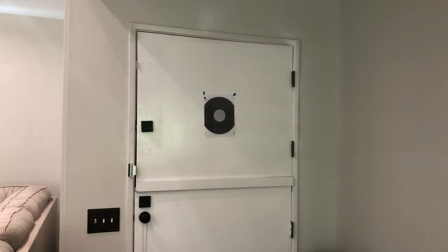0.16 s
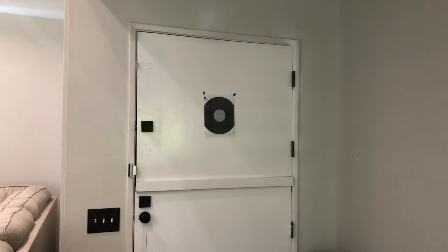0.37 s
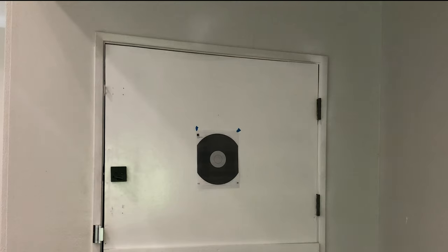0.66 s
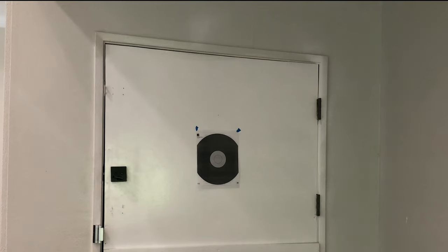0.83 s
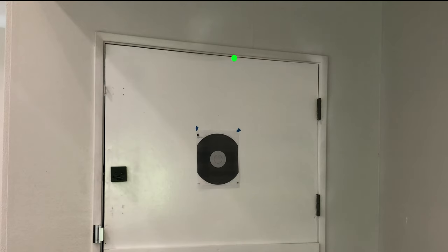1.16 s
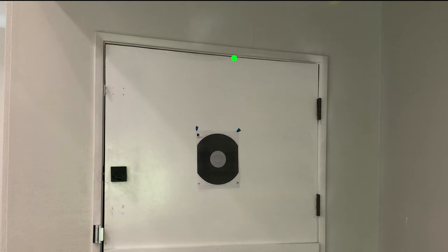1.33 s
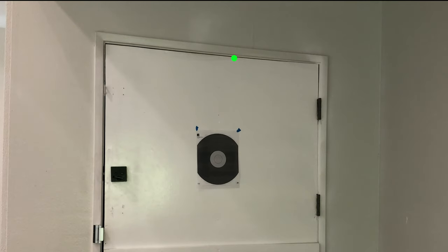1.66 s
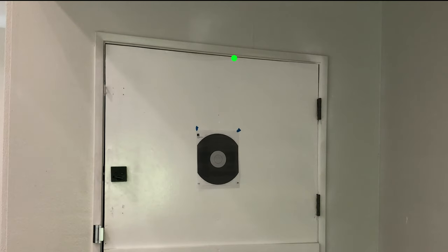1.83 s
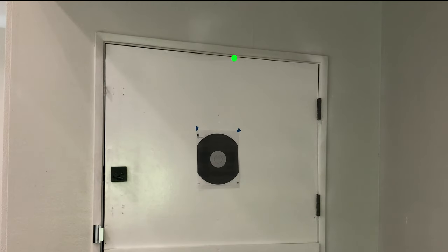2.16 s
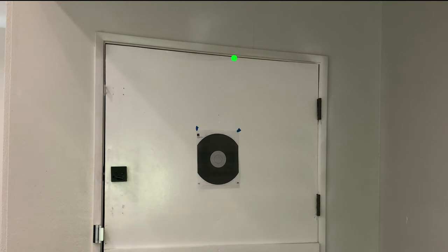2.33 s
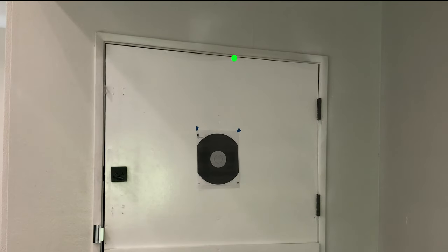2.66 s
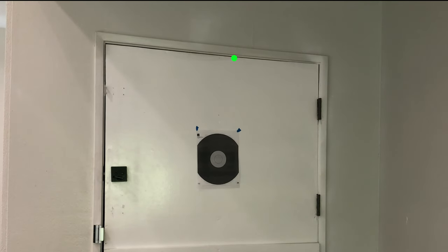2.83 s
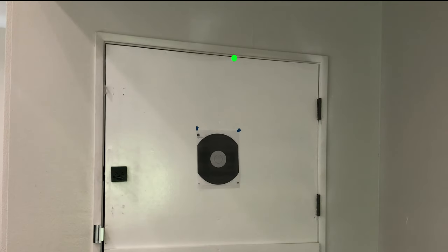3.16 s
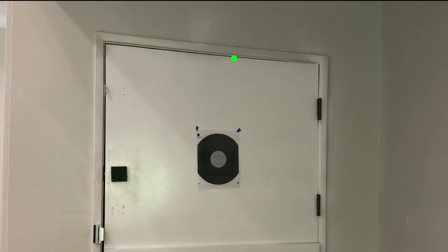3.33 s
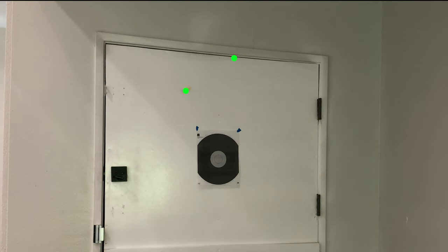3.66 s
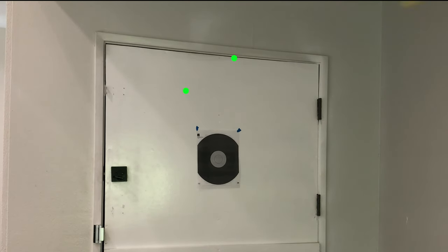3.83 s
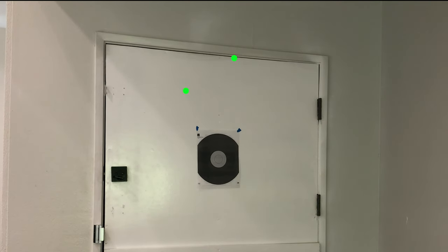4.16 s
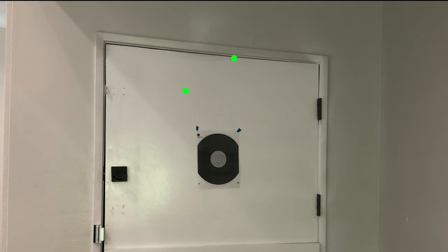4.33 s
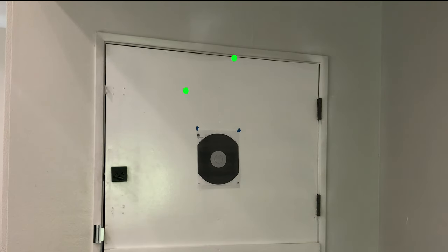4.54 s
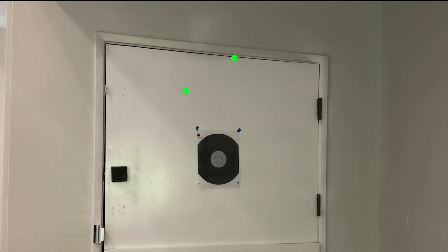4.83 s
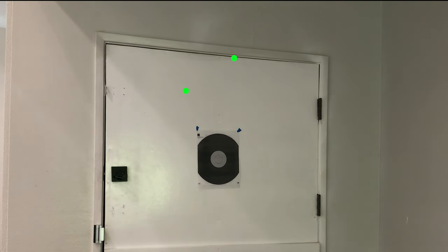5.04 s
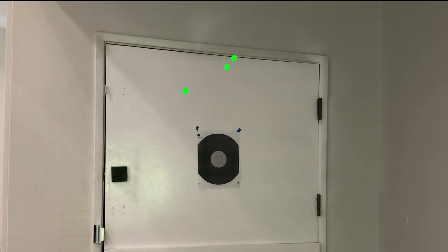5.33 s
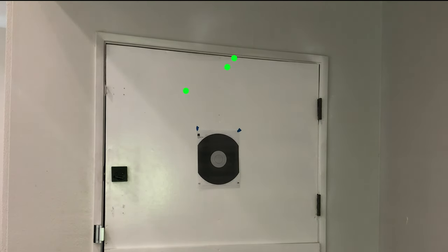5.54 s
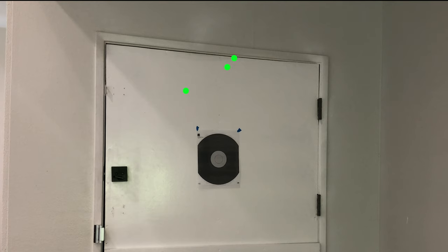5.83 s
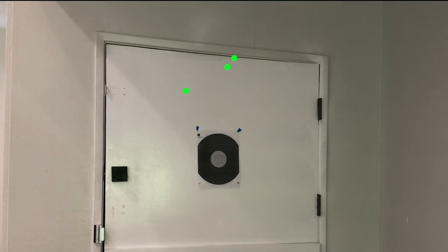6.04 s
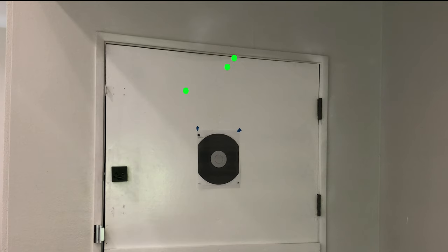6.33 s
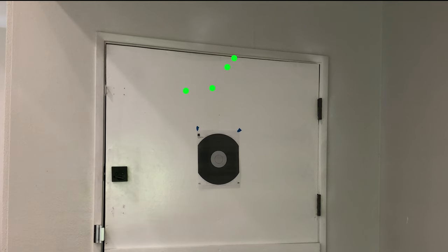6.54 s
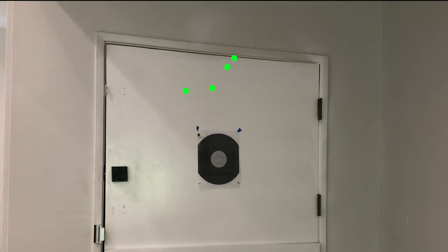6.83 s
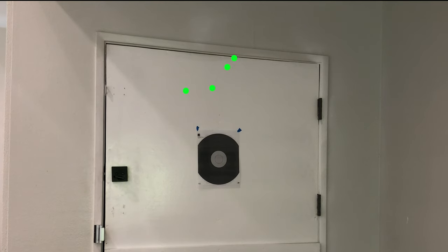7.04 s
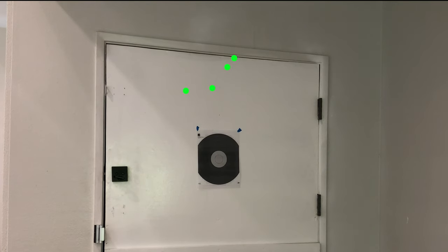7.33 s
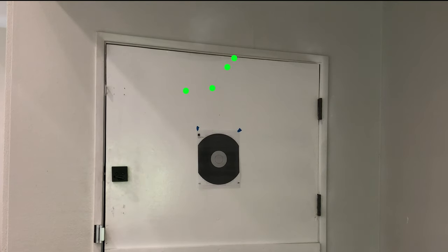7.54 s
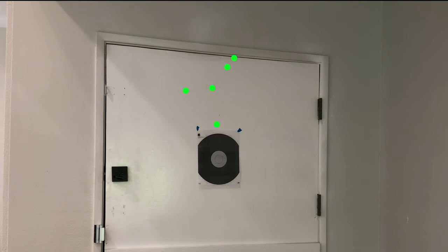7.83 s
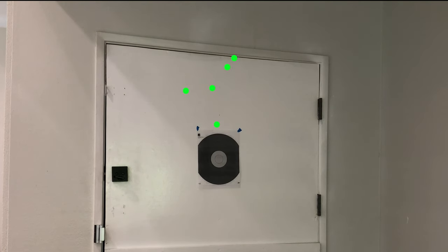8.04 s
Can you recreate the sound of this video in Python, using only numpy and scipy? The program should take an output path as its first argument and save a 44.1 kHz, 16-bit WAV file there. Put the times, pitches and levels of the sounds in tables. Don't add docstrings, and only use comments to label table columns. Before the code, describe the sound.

Indoors, five plasticky air pops are each followed by a sharp, loud door smack, then clattering pump strokes and soft ball bounces, all echoing.

```python
import sys
import numpy as np
from scipy import signal
from scipy.fft import rfft, irfft, next_fast_len
from scipy.io import wavfile
from scipy.ndimage import uniform_filter1d

SR = 44100
rng = np.random.default_rng(int(sys.argv[2]) if len(sys.argv) > 2 else 0)


def file_out(sig):
    cols = np.atleast_2d(sig).T
    lim = np.clip(cols, -1, 1)
    pcm = np.round(lim * 32767).astype(np.int16)
    wavfile.write(sys.argv[1], SR, pcm)


def decibels_to_gain(level_db):
    exponent = np.asarray(level_db, float) / 20
    return 10 ** exponent


N = 361179

# start_s, barrel_db, slam_db, slam_lag_ms, thump_db
SHOTS = [
    (1.003, -11.5, -13, 10.5, -25),
    (3.421, -10, -12, 9.2, -25.5),
    (4.876, -10, -11.5, 10.1, -24.5),
    (6.144, -10.5, -12, 9.7, -26.5),
    (7.417, -10.5, -10.5, 9.5, -26),
]
# start_s, smack_db, skin_ring_db, boom_db
SMACKS = [
    (1.2799, -7.5, -4.5, -37),
    (3.716, -8, -9, -49),
    (5.1664, -7, -4, -40.5),
    (6.432, -7, -6.5, -35.5),
    (7.7068, -8.5, -12, -35),
]
# stop_s, stop_db, catch_lead_ms, catch_db, nudge_db
PULLS = [
    (2.3456, -17, 60, -25.5, -30.5),
    (4.0756, -14, 37, -22.5, -26.5),
    (5.452, -15.5, 43.4, -20.5, -26.5),
    (6.7116, -14, 35.4, -21, -26),
    (8.024, -17, 49.7, -22.5, -25.5),
]
# stop_s, stop_db, release_lead_ms, release_db
PUSHES = [
    (2.6619, -19, 40, -22.5),
    (4.371, -21.5, 46.3, -21.5),
    (5.7104, -20.5, 46.8, -21.5),
    (6.976, -21, 45.4, -22.5),
]
# frequency_hz, level_db
SHELL = [(710, -58.5), (1200, -2), (1890, 6), (3150, 5.5), (3510, -2), (3950, 3), (7170, 3), (8260, -2),
         (13000, -3), (16000, -26)]
# frequency_hz, level_db
SHELL_BODY = [(150, -23), (230, -8.5), (330, 4), (500, -5), (720, -1.5), (1040, 1.5), (1400, -8),
              (2200, -24.5)]
# frequency_hz, level_db
TUBE = [(450, -37.5), (620, -2.5), (720, 0), (800, -3.5), (1100, -26.5)]
# frequency_hz, t60_s
ROOM_T60 = [(60, 0.4), (160, 0.47), (420, 0.68), (1100, 0.56), (2900, 0.57), (7700, 0.45), (15000, 0.24)]


def time_ms(count):
    return np.arange(count) * 1000 / SR


def add(track, start_s, sound):
    i = int(start_s * SR)
    track[i:i + len(sound)] += sound[:N - i]


def on_log(hz, table):
    table_hz, values = np.array(table)[:, 0], np.array(table)[:, 1]
    return np.interp(np.log(hz + 1), np.log(table_hz), values)


def colour(x, table):
    gain = decibels_to_gain(on_log(np.fft.rfftfreq(len(x), 1 / SR), table))
    return irfft(rfft(x) * gain / np.sqrt(np.mean(gain ** 2)), len(x))


def ring(modes, push, scatter_db, drift=0.0062):
    t = np.arange(int(SR * max(np.array(modes)[:, 2]))) / SR
    luck = rng.standard_normal((len(modes), 2))
    free = np.zeros(len(t))
    for (hz, db, t60_s), (level_luck, pitch_luck) in zip(modes, luck):
        tone = np.sin(2 * np.pi * hz * (1 + drift * pitch_luck) * t)
        free += decibels_to_gain(db + scatter_db * level_luck) * tone * decibels_to_gain(-60 * t / t60_s)
    out = signal.fftconvolve(free, push)
    return out / np.abs(out).max()


def tone_burst(hz, count):
    return np.hanning(count) * np.sin(2 * np.pi * hz * time_ms(count) / 1000)


def clatter(rise_ms, fall_ms, grain_db):
    t = time_ms(SR // 8) - 40
    shape = np.exp(np.where(t < 0, t / max(rise_ms, .2), -t / max(fall_ms, .5)))
    unevenness = np.minimum(rng.exponential(size=len(t)), 3.5)
    grains = rng.standard_normal(len(t)) * decibels_to_gain(grain_db * unevenness)
    return shape * grains / grains.std()


def ventilation():
    # frequency_hz, level_db (per Hz)
    murmur = [(12, -22), (20, -2.5), (46, -11), (83, -6), (162, -9), (214, -11), (246, -4.5), (316, -14.5),
              (363, -9), (551, -19), (860, -22), (1880, -30), (13200, -36), (15600, -46)]
    flicker = np.repeat(rng.standard_normal(N // 1500 + 1), 1500)[:N]
    flicker = uniform_filter1d(flicker, size=1500)
    noise = colour(rng.standard_normal(next_fast_len(N)), murmur)[:N]
    return decibels_to_gain(-65.5 + 1.5 * flicker) * noise


def room(send):
    fill_ms = 5.5
    t = time_ms(SR)
    octave = np.log2(np.fft.rfftfreq(SR, 1 / SR) + 1)
    echoes = rfft(rng.standard_normal(SR))
    tail = np.zeros(SR)
    for k in range(4, 15):
        band = irfft(echoes * np.clip(1 - np.abs(octave - k), 0, 1), SR)
        tail += band * decibels_to_gain(-.06 * t / on_log(2. ** k, ROOM_T60))
    tail *= 1 - np.exp(-t / fill_ms)
    return signal.fftconvolve(send, tail / np.sqrt(np.sum(tail ** 2)))[:N]


def diffuse(send):
    fill_ms, late_cycles = 0.28, 0.5
    far_room_db, far_room_slower = -13.5, 1.65
    size = next_fast_len(N + SR // 2)
    third = 3 * np.log2(np.fft.rfftfreq(size, 1 / SR) + 1)
    given, dense = rfft(send, size), rfft(rng.standard_normal(size))
    out = np.zeros(N)
    fill = np.exp(-1000 / SR / fill_ms)
    for k in range(17, 43):
        hz = 2 ** (k / 3)
        band = np.cos(np.pi / 2 * np.clip(third - k, -1, 1))
        power = irfft(given * band, size)[:N] ** 2
        keep = decibels_to_gain(-2 * 60 / SR / on_log(hz, ROOM_T60))
        poles = np.convolve([1, -keep], [1, -fill])
        energy = signal.lfilter([(1 - keep) * (1 - fill)], poles, power)
        slow = keep ** (1 / far_room_slower)
        energy = energy + decibels_to_gain(2 * far_room_db) * signal.lfilter([1 - slow], [1, -slow], energy)
        late = int(late_cycles * SR / hz)
        echoes = irfft(dense * band, size)[:N]
        out[late:] += np.sqrt(np.abs(energy))[:N - late] * echoes[late:] / echoes.std()
    return out


def latch_spring():
    # start_s, level_db, pitch_hz
    latch_pings = [
        (0.293, -59, 1050),
        (0.384, -52, 1093),
    ]
    out = np.zeros(N)
    for start_s, db, hz in latch_pings:
        modes = [(hz, 0, .05), (0.99 * hz, -3, .03)]
        add(out, start_s, decibels_to_gain(db + 2.0) * ring(modes, tone_burst(hz, 150), 0, drift=0))
    return out


def handling():
    # start_s, level_db, die_away_ms
    snicks = [
        (0.295, -53, 3.2),
        (2.0936, -55, 5),
        (2.1355, -49, 5.3),
        (2.158, -59, 9),
        (2.185, -54, 9),
        (2.21, -56, 6),
        (3.349, -60.5, 3.7),
    ]
    # frequency_hz, level_db
    loose_parts = [(250, -22), (500, -2), (1100, -0.5), (2500, -3), (5000, -1), (7000, -14), (16000, -22)]
    # start_s, level_db
    fumbles = [
        (2.02, -54),
        (2.033, -49),
        (2.053, -61),
        (2.074, -52),
    ]
    # start_s, level_db
    pings = [
        (0.296, -48),
        (1.229, -40),
        (1.516, -37.5),
        (2.234, -45),
        (5.1088, -34),
        (6.3794, -33.5),
        (7.652, -35),
    ]
    palm = [(100, -23), (220, 5.5), (800, -1), (2200, -8), (4000, -27)]  # frequency_hz, level_db
    thin_spring = [(3000, -31.5), (7000, 0.5), (11000, -7.5), (16000, -7.5)]  # frequency_hz, level_db
    out = np.zeros(N)
    for start_s, db, fall_ms in snicks:
        add(out, start_s - .038, decibels_to_gain(db) * colour(clatter(2.8, fall_ms, 2.4), loose_parts))
    for start_s, db in fumbles:
        add(out, start_s - .038, decibels_to_gain(db - 3) * colour(clatter(2.5, 6.0, 0.9), palm))
    for start_s, db in pings:
        add(out, start_s - .04, decibels_to_gain(db - 4.0) * colour(clatter(.8, 1.0, 1.5), thin_spring))
    return out


def bounces():
    # start_s, thud_db, tick_db, firmness_ratio, die_away_ms
    landings = [
        (1.77, -51, -72, 0.68, 17),
        (4.183, -29, -41, .9, 18),
        (4.665, -40, -39.5, 1, 15),
        (4.677, -43.5, -40, 1.2, 6),
        (6.748, -28, -50, 1, 8.2),
        (7.203, -38, -28, 1.8, 12),
        (7.21, -43, -35, 1.4, 8),
    ]
    # frequency_hz, level_db
    boards = [(40, -29.5), (90, -10), (200, -2), (330, 3), (520, -3.5), (800, -10), (1500, -38)]
    # frequency_hz, level_db
    contact = [(1100, -31.0), (1700, 2), (2300, 3), (3000, -6.5), (6000, -13.5), (16000, -24)]
    out = np.zeros(N)
    for start_s, thud_db, tick_db, firm, fall_ms in landings:
        spot = [(hz * max(firm, .3), db) for hz, db in boards]
        add(out, start_s - .038, decibels_to_gain(thud_db) * colour(clatter(0.62, fall_ms, 0), spot))
        add(out, start_s - .04, decibels_to_gain(tick_db) * colour(clatter(0.26, 1.0, 0.9), contact))
    return out


def strokes():
    # run_up_ms, die_away_ms, body_db, barrel_db, barrel_lead_ms
    nudge = (3.8, 0, -5, -19, 2)
    catch = (1, 6.5, 2.5, -10.5, 11)
    rear_stop = (6, 6.5, -.5, -18, 4.5)
    release = (7.5, 4, 1, -9.5, 4)
    front_stop = (8.5, 5, 3.5, -20, 4.5)
    nudge_ms, nudge_slowing = 18.5, .24
    pull_scrape_db, push_scrape_db = np.array((-35.5, -29.5)), np.array((-28, -18.5))
    lead_s, fall_s, start_db, end_db = 19.5 / 1000, 8.9 / 1000, -17, -22
    knocks, spans = [], []
    for stop_s, db, lead_ms, catch_db, nudge_db in PULLS:
        catch_s = stop_s - lead_ms / 1000
        first_s = stop_s - (lead_ms + nudge_ms + nudge_slowing * lead_ms) / 1000
        knocks += [(first_s, nudge_db, *nudge), (catch_s, catch_db, *catch), (stop_s, db, *rear_stop)]
        spans.append((first_s, stop_s, db + pull_scrape_db))
    for stop_s, db, lead_ms, release_db in PUSHES:
        release_s = stop_s - lead_ms / 1000
        knocks += [(release_s, release_db, *release), (stop_s, db, *front_stop)]
        spans.append((release_s, stop_s, db + push_scrape_db))
    t, effort = np.arange(N) / SR, np.zeros(N)
    for first_s, stop_s, (first_db, stop_db) in spans:
        corners_s = [first_s - lead_s, first_s, stop_s, stop_s + fall_s]
        levels = decibels_to_gain(np.array([first_db + start_db, first_db, stop_db, stop_db + end_db]))
        effort += np.interp(t, corners_s, levels, 0, 0)
    return knocks, effort


def slide():
    # frequency_hz, level_db, t60_s
    shell_walls = [(1040, -1, .03), (2300, -5, .012), (5300, -7, .008), (6450, 0.1, .022), (7200, -5, .012)]
    tone, rattle = np.zeros(N), np.zeros(N)
    knocks, effort = strokes()
    for start_s, db, rise_ms, fall_ms, body_db, tube_db, lead_ms in knocks:
        blow = clatter(rise_ms, fall_ms, 3.0)
        add(rattle, start_s - .0365, decibels_to_gain(db - 9) * colour(blow, SHELL))
        add(rattle, start_s - .0365, decibels_to_gain(db + body_db - 14.5) * colour(blow, SHELL_BODY))
        add(tone, start_s - .04 - lead_ms / 1000, decibels_to_gain(db + tube_db) * colour(blow, TUBE))
    for stop_s, db, *_ in PULLS + PUSHES:
        add(tone, stop_s + 0.0037, decibels_to_gain(db - 11) * ring(shell_walls, np.hanning(5), 3.8, drift=0.053))
    size = next_fast_len(N)
    unevenness = np.minimum(rng.exponential(size=size), 3.5)
    grit = rng.standard_normal(size) * decibels_to_gain(4 * unevenness) / 2
    scrape = colour(grit, SHELL) + decibels_to_gain(-3.5) * colour(grit, SHELL_BODY)
    tone += decibels_to_gain(-6.0) * effort * colour(grit, TUBE)[:N]
    return tone, rattle + effort * scrape[:N]


def bending_waves():
    # lag_ms, level_db
    edges = [(0, 0), (.9, 0), (2.8, -1), (3.5, -4), (4.8, -4), (7.0, -6), (8.6, -9), (9.8, -9), (12.5, -11)]
    out, t = np.zeros(N), time_ms(200)
    swing = np.exp(-t / 1.3) - .5 * np.exp(-((t - .16) / .07) ** 2)
    for start_s, smack_db, _, _ in SMACKS:
        for lag_ms, db in edges:
            distance_luck, level_luck = rng.standard_normal(2)
            khz = 1.0 + 13 / (1 + t / (.16 + .015 * distance_luck)) ** 2
            chirp = swing * np.sin(2 * np.pi * np.cumsum(khz) * 1000 / SR)
            add(out, start_s + (.8 + lag_ms) / 1000, decibels_to_gain(smack_db + db + level_luck + 3) * chirp)
    return out


def door_skin():
    # frequency_hz, level_db, t60_s
    skin_modes = [(906, -4, 0.0083), (1060, -5, 0.025), (1280, -10.5, .02), (2000, 3.5, 0.013),
                  (2750, -2.5, 0.011)]
    out = np.zeros(N)
    for start_s, _, skin_db, _ in SMACKS:
        add(out, start_s + 0.0023, decibels_to_gain(skin_db - 8) * ring(skin_modes, np.hanning(12), 1.7, drift=0.021))
    return out


def door_panel():
    # frequency_hz, level_db
    panel = [(65, -57), (110, -14), (241, -3), (284, 6), (374, -5), (453, -1), (606, -3.5), (775, 6.5),
             (832, -10.5), (900, 4.5), (1170, -39.5), (1980, -120)]
    # frequency_hz, level_db, t60_s
    boom = [(52, -18.5, .45), (69, 0, 0.13), (97, -18.5, 0.33)]
    out = np.zeros(N)
    for start_s, _, _, boom_db in SMACKS:
        add(out, start_s - .028, decibels_to_gain(-15) * colour(clatter(5.5, 9.0, 0), panel))
        add(out, start_s + .012, decibels_to_gain(boom_db + 7.5) * ring(boom, np.hanning(200), 1.5))
    return out


def door_latch():
    # start_s, level_db
    rattles = [
        (3.718, -5.5),
        (3.725, -1),
        (3.732, 1.5),
        (3.745, -3),
        (3.759, -7),
        (3.772, -9),
        (3.785, -12),
        (7.477, -22),
    ]
    # frequency_hz, level_db, t60_s
    latch_modes = [(302, -10.5, 0.2), (402, 3, 0.084), (520, 2, 0.078), (603, 1.5, 0.059)]
    out = np.zeros(N)
    for start_s, db in rattles:
        add(out, start_s, decibels_to_gain(db - 3) * ring(latch_modes, np.hanning(30), 2.0, drift=.04))
    return out


def piston_slam():
    # frequency_hz, level_db
    slam = [(440, -43.5), (750, 0.1), (1050, 0.5), (1500, -7), (1950, -5), (2700, -11), (4450, -11),
            (5320, -9.5), (7140, -16), (13400, -17), (16000, -31.5)]
    # frequency_hz, level_db, t60_s
    stock = [(104, -15, 0.11), (254, 8.5, 0.15)]
    out = np.zeros(N)
    for start_s, _, slam_db, lag_ms, thump_db in SHOTS:
        add(out, start_s, decibels_to_gain(thump_db) * ring(stock, np.hanning(60), 1.3))
        add(out, start_s + lag_ms / 1000 - .04, decibels_to_gain(slam_db) * colour(clatter(4.64, 4.77, 0.67), slam))
    return out


def barrel_returns():
    # lag_ms, level_db, pitch_hz, t60_s
    wall_returns = [
        (70, -7.5, 644, 0.063),
        (115, -19.5, 595, .07),
        (170, -13.5, 665, 0.049),
        (215.3, -19.5, 840, .07),
        (240, -19, 745, .13),
    ]
    out = np.zeros(N)
    for start_s, barrel_db, *_ in SHOTS:
        for late_ms, db, hz, t60_s in wall_returns:
            far_tone = ring([(hz, 0, t60_s)], tone_burst(hz, 500), 0, drift=0.015)
            add(out, start_s + late_ms / 1000, decibels_to_gain(barrel_db + db + 0.5) * far_tone)
    return out


def barrel_air():
    # frequency_hz, level_db, t60_s
    barrel_modes = [(560, -12, 0.065), (610, -4, 0.039), (686, 6, .028), (744.4, -3, 0.09),
                    (1050, -0.5, 0.06), (1700, -11, 0.018)]
    out, t = np.zeros(N), time_ms(400)
    for start_s, barrel_db, *_ in SHOTS:
        flutter = np.sin(2 * np.pi * .67 * t)
        push = (t / t[-1]) ** 2.1 * (flutter + 1.1 * rng.standard_normal(len(t)))
        tone = ring(barrel_modes, push - push.mean(), 0.9, drift=0.0097)
        add(out, start_s - .006, decibels_to_gain(barrel_db + 5.8) * tone)
    return out


def scene():
    # frequency_hz,
    # level_db
    door_spread = [(60, -4.5), (300, -6), (1000, -5.5), (1450, -8.5), (2000, -5.5), (3000, -1), (8000, -2),
                   (15000, -9)]
    barrel, far_tones, crash = barrel_air(), barrel_returns(), piston_slam()
    tube, rattle = slide()
    rattle += handling()
    skin = door_skin()
    smack = bending_waves() + door_panel() + door_latch()
    thud, pings = bounces(), latch_spring()

    size = next_fast_len(N)
    spread_gain = decibels_to_gain(on_log(np.fft.rfftfreq(size, 1 / SR), door_spread))
    spread = irfft(rfft(smack, size) * spread_gain, size)[:N]
    noisy = decibels_to_gain(2.0) * crash + decibels_to_gain(2.0) * rattle + spread + decibels_to_gain(-2.0) * thud + decibels_to_gain(-2.5) * barrel
    pitched = decibels_to_gain(-1.5) * barrel + decibels_to_gain(-9.5) * far_tones + decibels_to_gain(-10.5) * pings
    pitched += decibels_to_gain(-1.5) * tube + decibels_to_gain(7.5) * skin
    walls = diffuse(noisy) + room(pitched)

    blaster = barrel + far_tones + crash + tube + rattle
    return (blaster + skin + smack + thud + pings + walls + ventilation())[None]


def band_limit(x):
    return signal.sosfilt(signal.butter(12, 17080, fs=SR, output="sos"), x)


def record(dry):
    x = signal.sosfilt(signal.butter(4, 45., "high", fs=SR, output="sos"), dry)
    x = np.tanh(0.89 * x) / 1.14
    x = signal.sosfilt(signal.ellip(8, .2, 60, 15950, fs=SR, output="sos"), x)
    return band_limit(x)


dry = scene()
out = record(dry)
file_out(out)
```